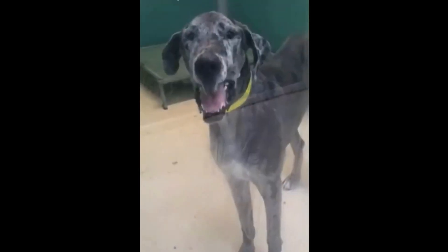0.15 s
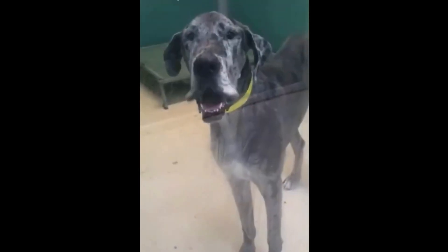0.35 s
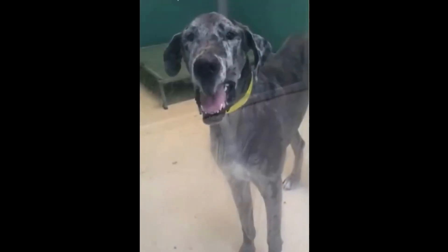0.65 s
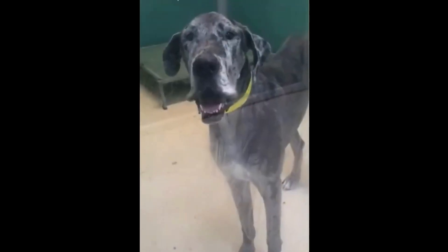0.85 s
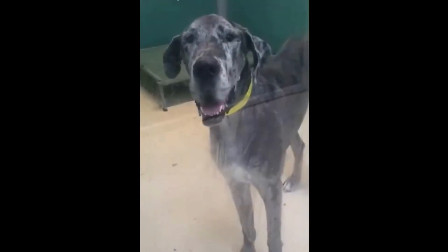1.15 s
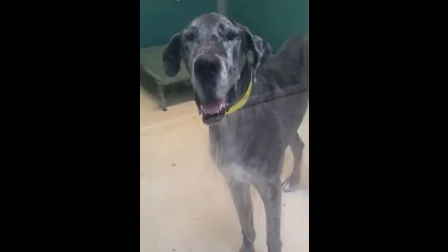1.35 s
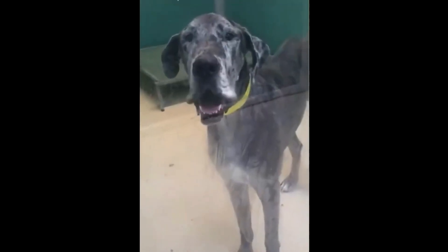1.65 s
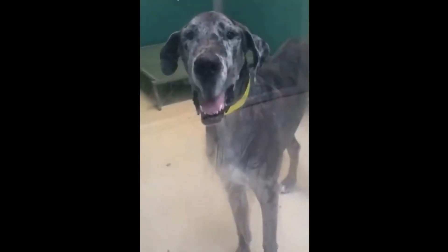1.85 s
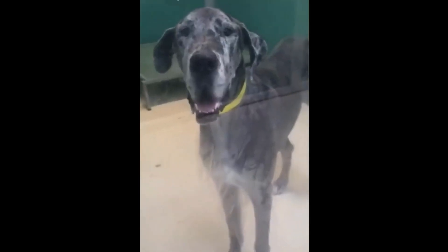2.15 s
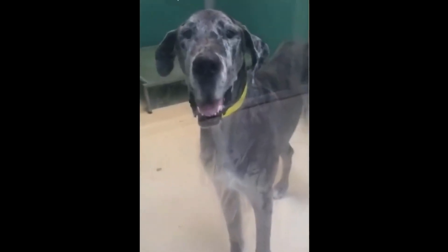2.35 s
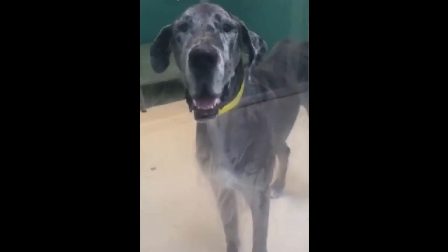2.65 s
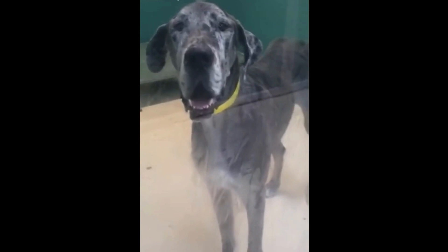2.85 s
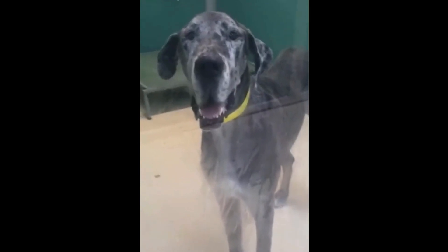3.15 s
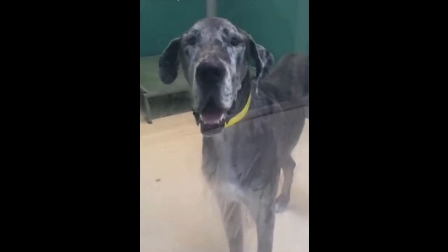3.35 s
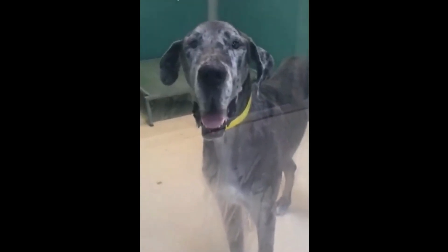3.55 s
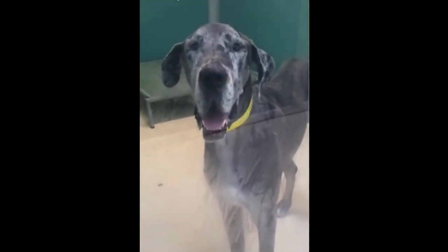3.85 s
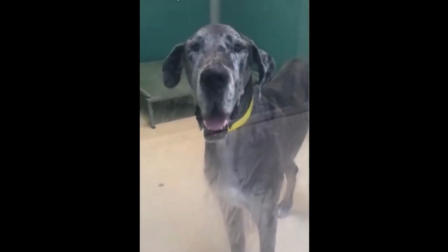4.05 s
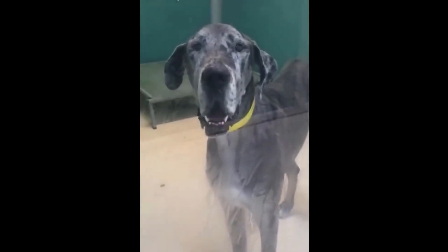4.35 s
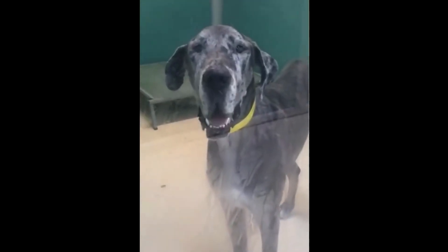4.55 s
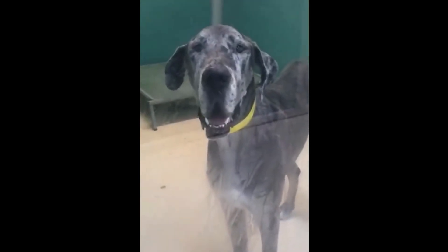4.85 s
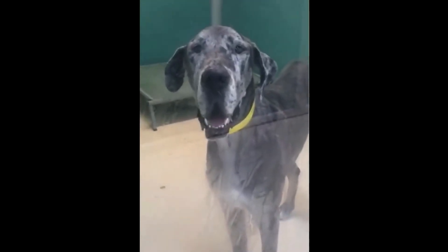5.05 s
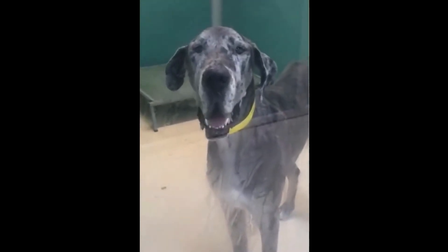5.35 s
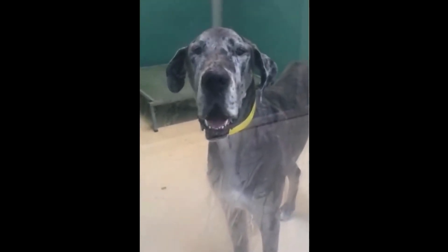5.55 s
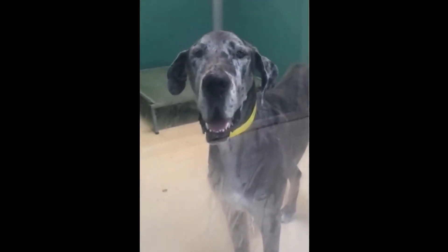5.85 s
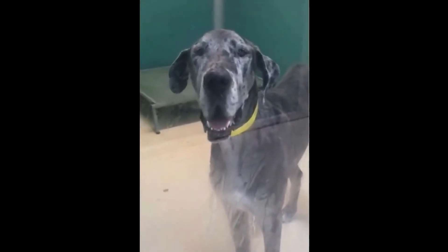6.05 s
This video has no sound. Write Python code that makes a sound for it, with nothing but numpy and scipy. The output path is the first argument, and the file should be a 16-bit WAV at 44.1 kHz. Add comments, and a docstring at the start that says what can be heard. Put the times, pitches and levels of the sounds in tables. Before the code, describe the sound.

Several dogs bark in an echoing indoor kennel: spaced single woofs, a quiet panting gap, then a crowded flurry of barks and shrill yelps.

```python
"""Several dogs bark and yelp in a hard-walled kennel hall, heard through a glass door.
Calls are voice pulses and breath noise through mouth and throat resonances, then a long hall tail.
A fan blows (steady shaped noise), a near dog pants (hiss in puffs), a faint whine is narrow noise,
and two dry ticks are decaying sines.
A small recorder pulls its gain down and overloads on the loudest barks."""
import sys
import numpy as np
from scipy import signal
from scipy.fft import rfft, irfft, next_fast_len
from scipy.io import wavfile
from scipy.ndimage import uniform_filter1d

SR = 44100
rng = np.random.default_rng(int(sys.argv[2]) if len(sys.argv) > 2 else 0)


def materialize(psi):
    """Save the field psi as 16-bit PCM at rate SR to the path in sys.argv[1].

    A 1-D psi becomes a single channel; in a 2-D psi each row is a channel.
    """
    bounded = np.clip(np.atleast_2d(psi).T, -1, 1)
    quanta = np.round(bounded * 32767).astype(np.int16)
    wavfile.write(sys.argv[1], SR, quanta)


N = 274302
LEAD = SR // 5  # samples of margin before time zero


def gain_of(db):
    """Amplitude factor of a level in dB."""
    return 10 ** (np.asarray(db) / 20)


def evened(x):
    """Scales to RMS 1."""
    return x / np.sqrt(np.mean(x ** 2) + 1e-20)


def read(points, hz):
    """Interpolates a (frequency, value) table over log frequency."""
    f, value = np.transpose(points)
    return np.interp(np.log(hz + 1), np.log(f + 1), value)


def colour(x, points):
    """Shapes a sound by a spectrum in dB, without phase shift."""
    size = next_fast_len(x.shape[-1] + 2048)
    gain = gain_of(read(points, np.fft.rfftfreq(size, 1 / SR)))
    return irfft(rfft(x, size) * gain, size)[..., :x.shape[-1]]


def resonate(x, hz, width_hz):
    """Resonance of gain 1: shifts the curve hz down to zero, smooths, and shifts back."""
    turn = np.exp(2j * np.pi * np.cumsum(hz * np.ones(len(x))) / SR)
    r = np.exp(-np.pi * width_hz / SR)
    smoothed = signal.lfilter([1 - r], [1, -r], x / turn + 1e-18)
    return 2 * (turn * smoothed).real


def resonate_twice(x, hz, width_hz):
    """Two equal resonances in series: steeper skirts."""
    return resonate(resonate(x, hz, width_hz), hz, width_hz)


def port_pair(a, b):
    """Two microphone ports: the right shares part of the left sound, band by band."""
    # left-right likeness: (frequency [Hz], shared amplitude [0-1])
    likeness = [(60, 1), (250, 0.85), (600, 0.93), (1300, 0.36), (2500, 0.059), (4500, 0.07), (8000, 1),
                (12000, 0.45)]
    # port balance: (frequency [Hz], left over right [dB])
    balance = [(40, -7), (125, -1.5), (600, -1.5), (1200, -3.5), (4000, 1.5), (12000, -1)]
    hz = np.fft.rfftfreq(len(a), 1 / SR)
    same = np.clip(read(likeness, hz), 0, 1)
    half = gain_of(read(balance, hz) / 2)
    left = rfft(a)
    right = same * left + np.sqrt(1 - same ** 2) * rfft(b)
    return irfft(np.array([left * half, right / half]), len(a))


def hall():
    """Sparse taps of random sign that swell in, each band dying at its own speed."""
    # reverberation: (frequency [Hz], 60 dB decay time [s])
    decay = [(200, 1.5), (600, 1.4), (850, 1.45), (1200, 1.2), (2000, 0.95), (3000, .9), (4500, .85),
             (8000, 0.9)]
    # walls and bedding swallow treble: (frequency [Hz], gain [dB])
    absorption = [(1000, -0.5), (2200, -3.5), (3300, -8.5), (5000, -8.5), (7500, -7.5)]
    taps = np.zeros((2, 2 * SR))
    at = np.arange(200, 2 * SR - 20, 20) + rng.integers(0, 20, (2, (2 * SR - 201) // 20))
    np.put_along_axis(taps, at, rng.choice([-1., 1.], at.shape), 1)
    hz, t, z = signal.stft(taps, SR, nperseg=256)
    swell_s = 0.0017
    shape = gain_of(-60 * t / read(decay, hz)[:, None]) * (1 - np.exp(-t / swell_s))
    shape /= np.sqrt((shape ** 2).sum(1, keepdims=True))  # equal energy in every band
    tail = signal.istft(z * shape, SR, nperseg=256)[1][:, :2 * SR]
    return colour(tail / np.linalg.norm(tail[0]), absorption)


def call(length_s, push_s, glide_s, hold_db, push_db, from_hz, to_hz, rough, mouth_hz, bright_db, treble_db,
         upper_hz, upper_db, after_db, odd_db, bite_hz, bite_db):
    """Wavering pulses and puffs of noise pass two mouth resonances and the wider, hoarser throat."""
    # what passes throat and door beside the mouth resonance: (frequency [Hz], gain [dB])
    throat_spectrum = [(400, 2), (600, 5), (900, 5.5), (1200, 4.5), (1550, -6), (2000, -7.5), (2500, -13),
                       (3200, -18), (4200, -28.5), (7000, -26), (9000, -26), (14000, -74.5)]
    rise_s, rise_db, fall_s, fall_db = .075, -45, 0.039, -18.5  # every call swells and dies away alike
    push_half_width_s, glide_lag_s = 0.021, 0.01394  # the pitch moves just after the push
    throat_push_share = 0.18  # how far the throat sound follows the push
    mouth_follow, sag_per_db = 1.25, .004  # mouth rise per share of pitch change; pitch share per push dB
    mouth_width_hz, upper_width_hz, bite_width_hz = 160., 250., 1200
    jitter, puff_gain, rasp_gain = .18, 5., 9.
    fundamental_db, breath_lead_db = -13, 22
    voicing_s = 0.046  # starts as breath; the vocal folds lock in over this time

    t = np.arange(0, length_s, 1 / SR)
    glide = np.clip((t - push_s - glide_lag_s) / max(glide_s, 1e-3) + .5, 0, 1)
    before_rise = np.clip(1 - t / rise_s, 0, 1) ** 2
    ends_db = rise_db * before_rise + fall_db * np.clip(1 - (length_s - t) / fall_s, 0, 1)
    push_db = push_db * np.exp(-((t - push_s) / push_half_width_s) ** 2)
    shape_db = push_db + after_db * glide
    effort_db = hold_db + ends_db + shape_db
    bright_db = bright_db - (1 - throat_push_share) * shape_db

    hz = from_hz + (to_hz - from_hz) * glide
    mouth_hz = mouth_hz * (1 + mouth_follow * abs(hz / from_hz - 1))  # opens wider as the pitch moves
    hz = hz * (1 - sag_per_db * push_db * (1 - glide))

    chance = rng.standard_normal((4, SR))[:, :len(t)]
    rough = np.clip(rough, .07, 1)
    waver = jitter * rough * evened(uniform_filter1d(chance[0], size=250))
    turns = np.cumsum(hz * (1 + waver)) / SR
    partials = []
    for k in range(1, 25):
        audible = k * hz < 5200
        partials.append(np.cos(2 * np.pi * k * turns) * audible * gain_of(odd_db * (k % 2)))
    if from_hz < .7 * mouth_hz[0]:
        partials[0] = partials[0] * gain_of(fundamental_db)  # weak below the mouth resonance
    shimmer = 1 + rough * evened(uniform_filter1d(chance[2], size=200))  # pulses differ in strength
    voicing = np.minimum(t / voicing_s, 1) ** 2
    folds = (1 - rough) * shimmer * np.sqrt(2) * sum(partials) * voicing
    puffs = (.15 + .8 * np.exp(-(turns % 1) / .4)) * chance[1]
    puffs = puffs * gain_of(breath_lead_db * before_rise)  # air flows before the voice swells

    mouth = resonate_twice(folds + puff_gain * rough * puffs, mouth_hz, mouth_width_hz)
    # away from the main resonance even a clear call stays hoarse
    hoarse = folds + rasp_gain * (rough + .08) * puffs
    throat = colour(hoarse, throat_spectrum)
    treble = throat - colour(throat, [(1900, 1.0), (2700, -30.0)])
    # the treble grows faster than the rest as the dog pushes harder
    treble_gain = gain_of(treble_db + 0.46 * (effort_db - effort_db.max()))
    throat = throat + (treble_gain - 1) * treble
    throat = throat + gain_of(upper_db) * resonate_twice(hoarse, upper_hz, upper_width_hz)
    bite = gain_of(bite_db) * shimmer * evened(resonate_twice(chance[3], bite_hz, bite_width_hz))

    voice = mouth + gain_of(bright_db) * throat + bite
    voice = colour(voice, [(150, -33), (330, -14), (430, -7), (560, 0)])  # a small mouth radiates little bass
    end_fades = np.clip(np.minimum(t, length_s - t) / .012, 0, 1) ** 2
    return gain_of(effort_db) * voice * end_fades


def dogs():
    """Each call comes through the door directly and again by one of four hall responses in turn."""
    # one row a call: (start [s], length [s], hardest push after start [s], pitch glide length [s],
    # effort [dB], push over it [dB], pitch before the glide and push sag [Hz], pitch after [Hz],
    # roughness [0-1], mouth resonance before the glide [Hz], throat brightness before the push [dB],
    # treble above about 2 kHz at peak effort [dB], upper mouth resonance [Hz], its level [dB],
    # effort change after the glide [dB], odd partials [dB], breathy bite [Hz], its level [dB],
    # direct sound over the hall [dB])
    dog_calls = [ (-.08, 0.18, 0.098, 0.092, -13.5, 7.6, 212.3, 231.2, 0.375, 679, -8.5, 1, 1826, -3.5, -5.5, 1, 3800, -33, -5),
                 (.7, .21, 0.095, 0.02, -13, 7.2, 338, 411, .25, 652, -4, -3.5, 2050, -14, -7, -11, 3530, -36.5, -6),
                 (1.232, .245, 0.075, .1, -38.5, 1.3, 440, 503, 0.3, 890, 10, 1, 3020, -12, 4, -2, 4500, -13, -8.5),
                 (2.292, 0.205, 0.103, 0.0069, -13.5, 12.5, 342, 413, 0.27, 660, -5.5, -2, 1990, -11, -7, -7.5, 3030, -34.5, -8),
                 (4.087, 0.215, 0.086, 0.0047, -19, 17.8, 345, 415, 0.27, 667, 0.5, -0.5, 1952, -8.5, -9, -9, 3550, -32.5, -9),
                 (4.475, 0.23, 0.12, 0.074, -38.5, 4.5, 270.3, 277.8, 0.26, 895, 10.5, 6.5, 1576, 2, -6.5, 4, 5580, -13, -15),
                 (4.58, 0.19, 0.079, 0.095, -17, 2.2, 462, 487.5, .13, 960, -5.5, 4.5, 2500, -4.5, -4, -3, 5950, -25.5, -15.5),
                 (4.77, 0.23, 0.18, 0.089, -44, 14, 271, 267, .3, 840, 17, 12.5, 1553, 4, 2.5, -4.5, 5930, -10.5, -14.5),
                 (4.87, 0.14, 0.073, 0.073, -9, 2.1, 528, 570, 0.19, 1060, -22, -5, 3200, -28, 2, -17, 5500, -38.5, -0.5),
                 (4.945, .33, 0.054, 0.22, -29.5, 5, 1270, 1243, .2, 1300, 3, -14.5, 2590, -10.5, -12.5, 1, 6000, -33, -3),
                 (5.27, 0.21, 0.075, .2, -19, 3.7, 1409, 1322, .2, 1380, -5.5, -16, 2676, -9.5, -17, 2.4, 6000, -41, -4.5),
                 (5.0, 0.23, 0.16, 0.2, -24, 2, 453.3, 461.4, 0.2, 915, -10, 13.5, 1460, 10, 4, -13, 5940, -38.5, -35),
                 (5.2, 0.15, 0.065, 0.04, -11, 5, 530, 575, 0.2, 1040, -14, 2, 3350, -28, -3, -5, 5500, -38, -2),
                 (5.4, 0.15, 0.08, 0.038, -26, 5, 541, 570, 0.18, 1075, -3, 2, 1700, -8, -3, 0, 6000, -34, -10),
                 (5.59, 0.21, 0.11, .12, -11.5, 3, 216, 224, 0.3, 645, -13, -5, 900, -11, -1, -3, 3500, -43, -11),
                 (5.765, 0.23, 0.092, 0.164, -19, 3.4, 214, 245, 0.3, 665, -13, -1, 1460, -4, -1, -2, 6670, -46, -10),
                 (6.083, 0.25, 0.085, 0.02, -19, 4, 303, 388, 0.26, 585, -5, -4.5, 2080, -12, -7, -8, 3520, -35, -5.5),
                 ]
    out = np.zeros((2, LEAD + N + 3 * SR))
    halls = [hall() for _ in range(4)]
    for k, (start_s, *settings, direct_db) in enumerate(dog_calls):
        voice = call(*settings)
        heard = signal.fftconvolve(voice[None], halls[k % 4], axes=1)
        heard[:, :len(voice)] += gain_of(direct_db) * voice
        start = LEAD + round(start_s * SR)
        out[:, start:start + heard.shape[1]] += heard
    return port_pair(*out)[:, LEAD:LEAD + N]


def fan():
    """Steady air noise: shaped random noise at both ports."""
    # fan spectrum: (frequency [Hz], relative density [dB per Hz])
    air_spectrum = [(20, -38.5), (48, -18.5), (162, -5), (219, -7), (314, -2), (547, -8.5), (839, -7.5),
                    (1560, -21), (2240, -20.5), (3290, -25.5), (4500, -30), (7200, -39), (9500, -35.5),
                    (14000, -54)]
    level_db = -50.5
    air = colour(rng.standard_normal((2, N)), air_spectrum)
    return gain_of(level_db) * evened(port_pair(*air))


def panting():
    """Thin hiss of breath over the tongue, in bell-shaped puffs."""
    # puffs: (middle [s], level [dB], length [s])
    breath_puffs = [(1.799, -88, 0.13), (2.0, -88, 0.098), (2.23, -73, 0.18), (3.04, -64.5, 0.15),
                    (3.163, -69.5, 0.065), (3.29, -67.5, 0.18), (3.395, -80, 0.059), (3.485, -67, 0.18),
                    (3.62, -68, 0.036), (3.77, -71.5, .08), (3.857, -71, 0.031)]
    # breath spectrum: (frequency [Hz], relative density [dB per Hz])
    breath_spectrum = [(1500, -56), (3000, -3), (5500, -22.5), (8000, -11), (11000, -17), (14000, -28)]
    t = np.arange(N) / SR
    level = sum(gain_of(db) * np.exp(-(2 * (t - middle_s) / length_s) ** 2)
                for middle_s, db, length_s in breath_puffs)
    return level * evened(colour(rng.standard_normal(N), breath_spectrum))


def whine():
    """A faint fuzzy whistle far down the hall: noise through a gliding narrow resonance."""
    # whine path: (time [s], pitch [Hz], level [dB])
    path = [(3.15, 2310, -79), (3.186, 2420, -79), (3.468, 2134, -64), (4.042, 2350, -80),
            (4.05, 2300, -84)]
    time_s, pitch_hz, level_db = np.transpose(path)
    t = np.arange(N) / SR
    fuzz = resonate_twice(rng.standard_normal(N), np.interp(t, time_s, pitch_hz), 120.)
    return gain_of(np.interp(t, time_s, level_db, -120, -120)) * evened(fuzz)


def ticks():
    """Short dry ticks, like claws on a hard floor: decaying sines."""
    # ticks: (time [s], starting level [dB], ring [Hz])
    tick_list = [(5.89, -40, 3650), (6.1898, -39, 3370)]
    decay_60db_s = 0.016
    out = np.zeros(N + SR)
    t = np.arange(300) / SR
    for start_s, peak_db, hz in tick_list:
        ring = gain_of(peak_db - 60 * t / decay_60db_s) * np.sin(2 * np.pi * hz * t)
        out[round(start_s * SR):][:300] += ring
    return out[:N]


def scene():
    """Sums all sources; panting, whine and ticks are equal at both ports."""
    return dogs() + fan() + panting() + whine() + ticks()


def record(dry):
    """Gain control drops fast and recovers slowly; a lopsided soft clip, treble lift and low-pass follow."""
    # treble lift: (frequency [Hz], gain [dB])
    treble_lift = [(4500, -0.5), (5500, 1), (7200, 9), (8500, -1), (11000, 5)]
    threshold_db, duck_share, recovery_db_per_s, lag_s = -19, 0.47, 60., .004
    ceiling, lean = gain_of(-8.5), .004
    edge_hz = 14400
    power_db = 10 * np.log10(abs(uniform_filter1d((dry ** 2).mean(0), size=130)) + 1e-12)
    fall_db = np.arange(N) * recovery_db_per_s / SR
    held_db = np.maximum.accumulate(power_db + fall_db) - fall_db
    over_db = np.maximum(held_db - threshold_db, 0)
    lag = np.exp(-1 / (lag_s * SR))
    ducked = dry / gain_of(duck_share * signal.lfilter([1 - lag], [1, -lag], over_db))
    bent = ducked / ceiling + lean
    clipped = ceiling * (bent / (1 + bent ** 4) ** (1 / 4) - lean)
    edge = signal.firwin(511, edge_hz, window=("kaiser", 9), fs=SR)
    # sound goes on past both ends
    wide = np.pad(clipped, [(0, 0), (LEAD, LEAD)], "reflect", reflect_type="odd")
    return signal.oaconvolve(colour(wide, treble_lift), edge[None], "same")[:, LEAD:LEAD + N]


dry = scene()
out = record(dry)
materialize(out)
```